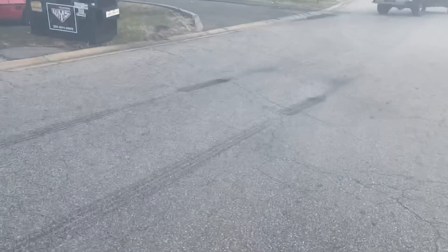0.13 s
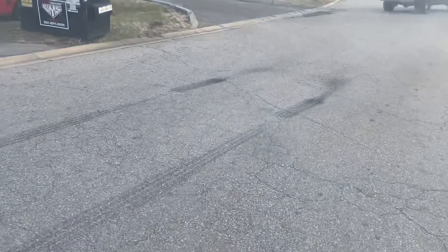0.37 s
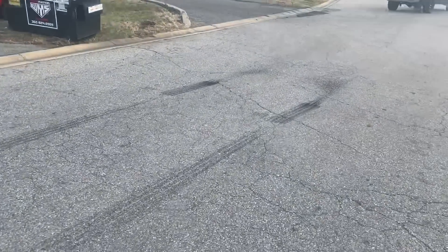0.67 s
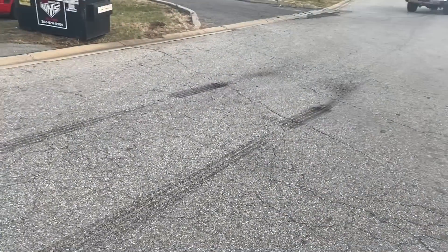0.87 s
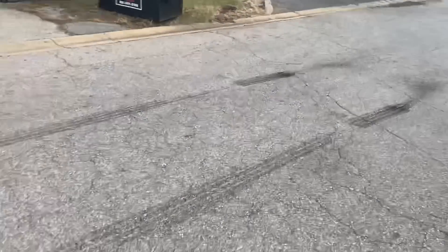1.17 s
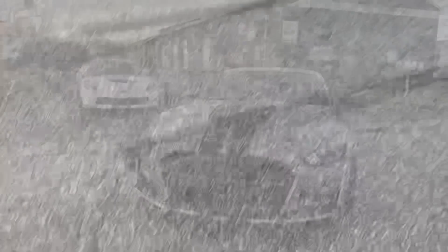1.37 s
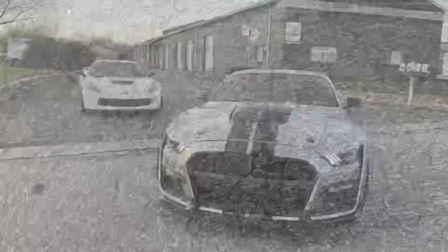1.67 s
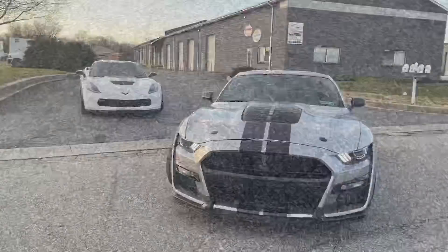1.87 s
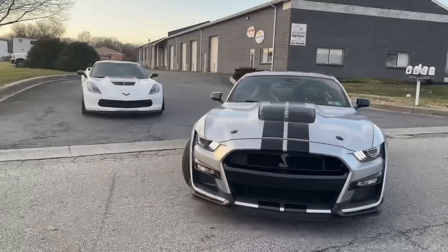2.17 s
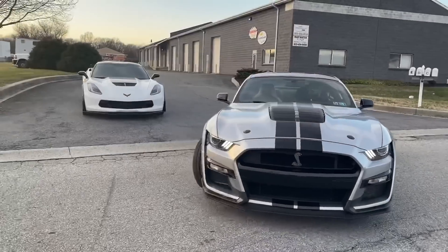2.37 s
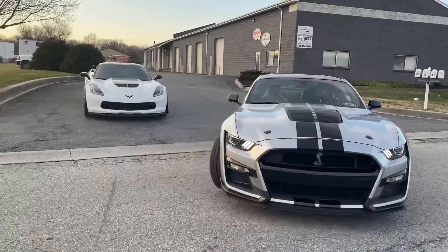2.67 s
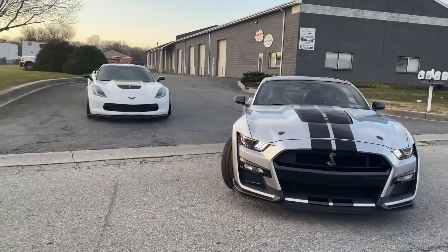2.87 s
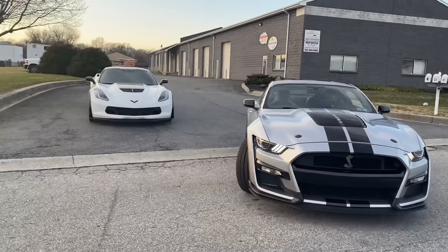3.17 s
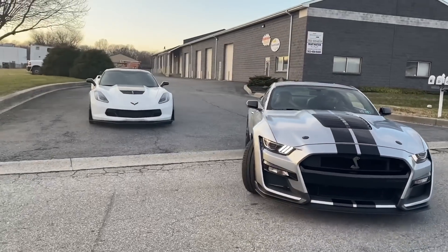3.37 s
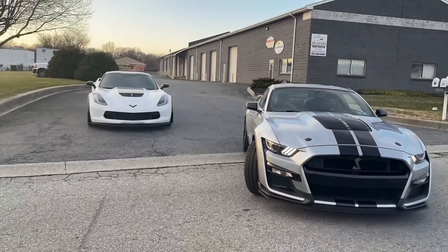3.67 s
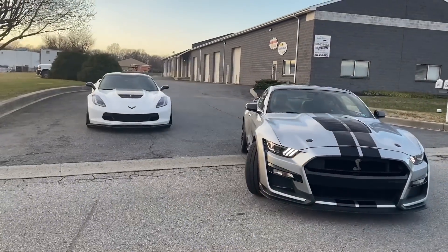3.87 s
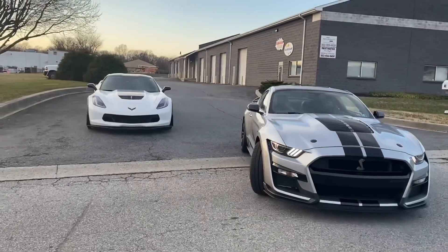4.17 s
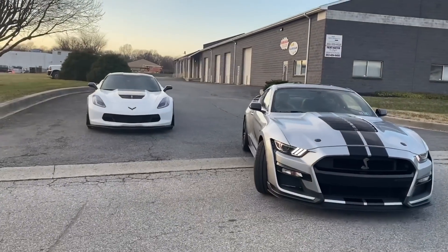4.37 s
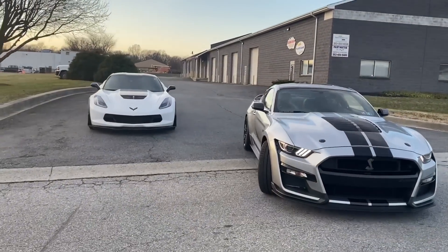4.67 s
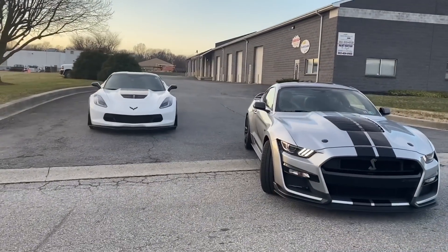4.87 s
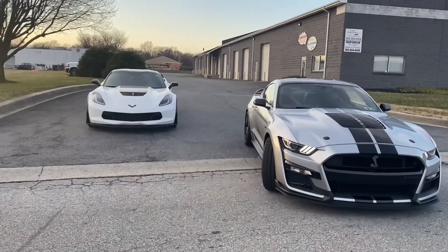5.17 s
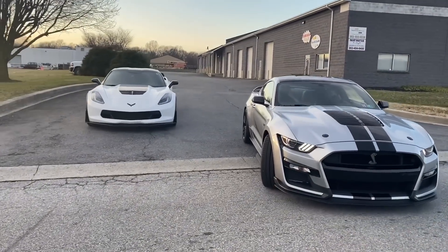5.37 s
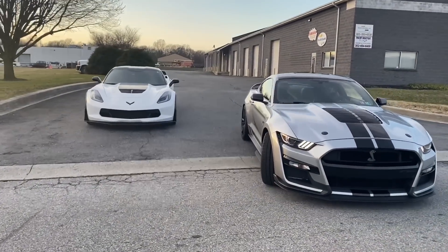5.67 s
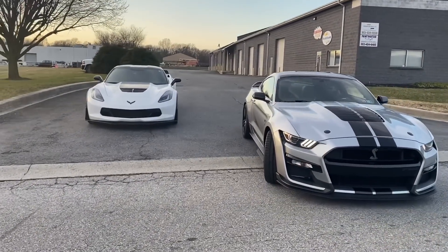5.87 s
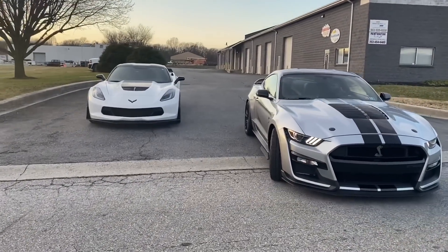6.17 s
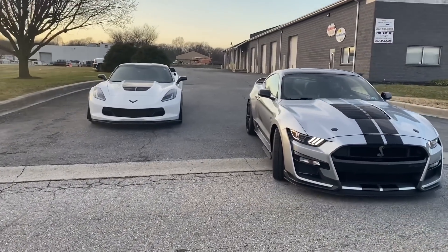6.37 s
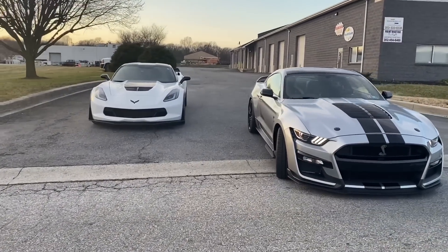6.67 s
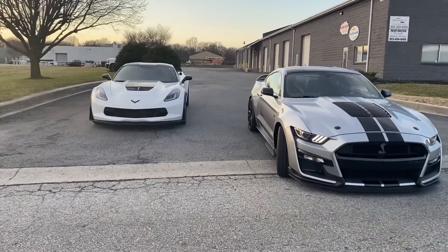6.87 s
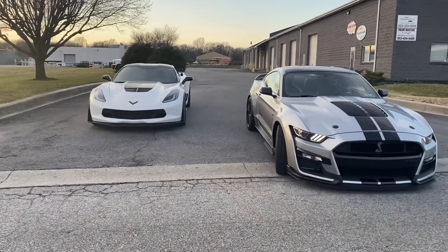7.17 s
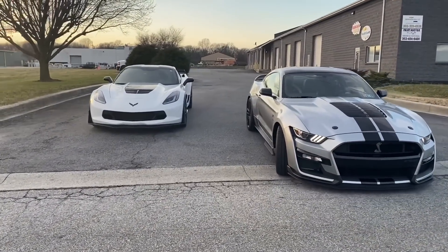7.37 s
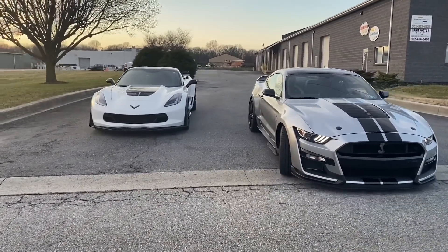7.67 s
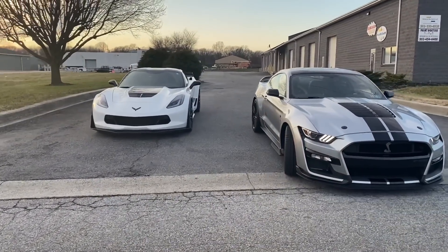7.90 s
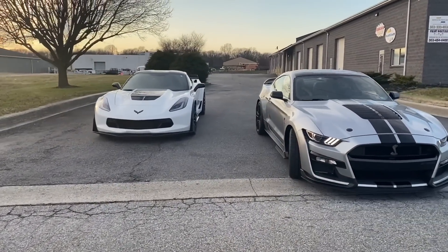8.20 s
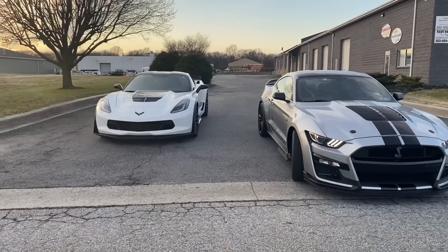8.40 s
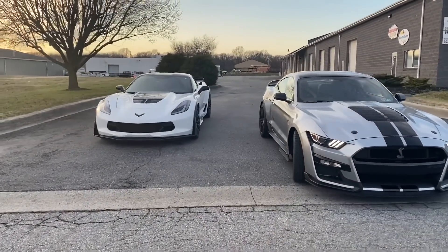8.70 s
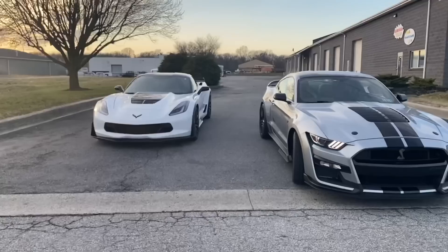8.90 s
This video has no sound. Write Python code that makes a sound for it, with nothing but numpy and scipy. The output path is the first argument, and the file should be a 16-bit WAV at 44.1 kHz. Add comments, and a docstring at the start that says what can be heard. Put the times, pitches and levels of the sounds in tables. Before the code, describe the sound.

A quiet, dull far-off engine rumble swells once, then over about a second crossfades to two cars idling close by outdoors. A heavy, uneven V8 throb sits over airy engine-bay rush and wavering belt whine. A few light taps bump the handheld microphone. From the middle onward the throttle is blipped, raspy and barking, falling back to lumpy idle, with two more pushes near the end. Short echoes return from a building.

```python
"""A distant idle rumbles and swells once; after a second it crossfades to two cars idling on a paved lot.
The near car rushes and whines: pulsing coloured noise and wavering belt sines. A few handling taps follow.
The V8 idles on: eight uneven firings a cycle ring its pipes, and a building throws the exhaust back.
Late on come three throttle blips and a light hold: the revs climb, and the gas rasps, hisses and barks more."""
import sys
import numpy as np
from scipy import signal
from scipy.fft import rfft, irfft, next_fast_len
from scipy.io import wavfile
from scipy.ndimage import uniform_filter1d, minimum_filter1d

SR = 44100
rng = np.random.default_rng(int(sys.argv[2]) if len(sys.argv) > 2 else 0)


def log_audio(samples):
    """Write samples as a 16-bit WAV file to the path given in sys.argv[1]."""
    # one column per channel
    frames = np.atleast_2d(samples).T
    # limit to full scale, then quantise
    limited = np.clip(frames, -1, 1)
    pcm = np.round(limited * 32767).astype(np.int16)
    wavfile.write(sys.argv[1], SR, pcm)


N = 398663
TIME = np.arange(N) / SR


def gain_of(db):
    """Decibels to a factor."""
    return 10 ** (np.asarray(db) / 20)


def evened(x):
    """Scales to rms 1."""
    return x / np.sqrt(np.mean(x ** 2) + 1e-20)


def steadied(x, size=9000):
    """Levels the slow loudness to rms 1 over windows of size samples, keeping the faster throb."""
    power = uniform_filter1d(uniform_filter1d(x ** 2, size), size)
    return x / np.sqrt(abs(power) + 1e-12)


def highpassed(x, order, hz):
    """Causal low cut."""
    return signal.sosfilt(signal.butter(order, hz, "high", fs=SR, output="sos"), x)


def split_off(x, order, hz, side):
    """The part of x above ("high") or below ("low") hz, without phase shift."""
    return signal.sosfiltfilt(signal.butter(order, hz, side, fs=SR, output="sos"), x)


def read(points, hz):
    """A spectrum table on a log-frequency axis."""
    f, value = np.transpose(points)
    return np.interp(np.log(hz + 1), np.log(f + 1), value)


def curves(rows):
    """Each column of a time table, for every sample."""
    s, *columns = np.transpose(rows)
    return [np.interp(TIME, s, c) for c in columns]


def coloured(x, points, size=16384):
    """Minimum-phase filter with the given spectrum: a pulse rings after it strikes."""
    log_gain = read(points, abs(np.fft.fftfreq(size, 1 / SR))) * np.log(10) / 20
    ring = np.fft.ifft(np.exp(np.conj(signal.hilbert(log_gain)))).real
    return signal.fftconvolve(x, ring[:size // 2])[:N]


def wander(rate_hz, size=32):
    """Slow random drift of rms 1, drawn once every size samples."""
    count = next_fast_len(N // size + 2)
    lowpass = np.exp(-(np.fft.rfftfreq(count, size / SR) / rate_hz) ** 2)
    slow = irfft(rfft(rng.standard_normal(count)) * lowpass, count)
    return np.interp(np.arange(N) / size, np.arange(count), evened(slow))


def resonate(x, hz, width):
    """A resonance of gain 1 that follows the curve hz."""
    turn, r = np.exp(2j * np.pi * np.cumsum(hz) / SR), np.exp(-np.pi * width / SR)
    return 2 * (turn * signal.lfilter([1 - r], [1, -r], x / turn)).real


def held(start, length, attack_s, release_s):
    """Rises from 0 to 1, holds until the length is over, then falls."""
    rise = np.clip((TIME - start) / attack_s, 0, 1)
    return rise * np.clip(1 - (TIME - start - length) / release_s, 0, 1)


# likeness of the two microphones: (frequency [Hz], correlation [-1 to 1])
MIC_LIKENESS = [(100, -0.062), (600, 0.9), (1400, 0.79), (3000, 0.52), (5000, -0.038), (7000, -0.052),
                (15000, 0.085)]


def noise_pair(points):
    """Coloured noise at two microphones: alike in the mids, unrelated in the deep bass and high treble."""
    hz = np.fft.rfftfreq(N, 1 / SR)
    a, b = rfft(rng.standard_normal((2, N)))
    same = np.clip(read(MIC_LIKENESS, hz), -1, 1)
    pair = np.array([a, same * a + np.sqrt(1 - same ** 2) * b])
    return evened(irfft(pair * gain_of(read(points, hz)), N))


def knock(s, db, hz, decay_s):
    """A short dull burst of noise around one pitch, dying away exponentially."""
    t = np.arange(SR // 8) / SR
    octave = signal.butter(2, [hz / np.sqrt(2), hz * np.sqrt(2)], "band", fs=SR, output="sos")
    burst = signal.sosfilt(octave, rng.standard_normal(len(t)))
    sound = gain_of(db) * evened(burst) * np.exp(-t / decay_s)
    return np.pad(sound, (round(s * SR), N))[:N]


# tone of the distant rumble: (frequency [Hz], relative level [dB])
DISTANT_COLOUR = [(20, -36), (40, -5), (80, -4.5), (150, -2), (190, -15), (320, -16), (375, -25),
                  (440, -13.5), (490, -20.5), (560, -27), (1000, -34.5), (1900, -42.5), (3400, -56),
                  (8000, -61), (11500, -90)]
# faint distant knocks: (time [s], level at the strike [dB], pitch [Hz])
DISTANT_KNOCKS = [(.135, -70, 1090), (.525, -54, 170)]
DISTANT_DB, FAR_BASS_DB = -52.5, -5.5  # rumble before the bass trim, and that trim
FAR_SWELL_AT_S, FAR_SWELL_S, FAR_SWELL_DB = 0.58, 0.065, 7  # one swell of the bass


def distant_idle():
    """A far engine: a wavering firing tone in a dull rumble that swells once, and faint knocks."""
    turns = np.cumsum(82 + 2 * wander(11.0)) / SR
    flutter_db = 1.5 * wander(14)
    rumble = gain_of(DISTANT_DB + flutter_db) * noise_pair(DISTANT_COLOUR)
    bass = split_off(rumble, 2, 300, "low")
    swell = np.exp(-((TIME - FAR_SWELL_AT_S) / FAR_SWELL_S) ** 2)
    rumble = rumble + (gain_of(FAR_BASS_DB + FAR_SWELL_DB * swell) - 1) * bass
    tone = gain_of(-56.5 + 2 * wander(21)) * np.sin(2 * np.pi * turns)
    return rumble + tone + sum(knock(*row, decay_s=.025) for row in DISTANT_KNOCKS)


# light handling taps on the microphone: (time [s], left level at the strike [dB])
HANDLING_TAPS = [(2.994, -34), (3.178, -28), (3.29, -28), (5.198, -26), (7.179, -28)]


def handling_taps():
    """Very short knocks, mostly in the left microphone."""
    taps = sum(knock(s, db, hz=1050, decay_s=0.0037) for s, db in HANDLING_TAPS)
    return taps * np.array([[1], [.15]])


# tone of the near car's rush: (frequency [Hz], relative level [dB])
BAY_TONE = [(100, 14), (400, -7), (650, 6.5), (880, 6), (1050, 0.5), (1220, 1.5), (1600, 0), (2200, -5),
            (2800, -7.5), (3400, -7.5), (4300, -11.5), (5600, -13), (7000, -14), (14000, -46)]
# belt and pulley tones: (multiple of the base tone, level before the belt curve [dB])
BELT_TONES = [(7, -47), (11, -79), (16, -44.5), (18, -50), (22, -51), (24, -48), (25, -53.5), (29, -66),
              (31, -52.5), (32, -57.5), (34, -55), (40, -55.5), (49, -60)]
# the bay along the walk: (time [s], rush level unloaded [dB], treble trim [dB], belt trim [dB])
BAY_WALK = [(1.25, -32.5, 2, -3), (1.7, -32, 0.5, 1), (2.3, -31, -1, 6), (3.0, -33, -0.5, 2.5),
            (3.6, -35, -3, 1), (5.5, -35, -2.5, 0), (7.3, -35, -5.5, -6), (9, -36.5, -2, 2)]
WHINE_HZ = 37.83  # mean base tone of the belt
BAY_LOAD_DB = 2  # the bay rushes louder under full load


def engine_bay(load):
    """Fan and valve-train noise of the near car, pulsing with its crank, and its wavering belt tones."""
    level_db, treble_db, belt_db = curves(BAY_WALK)
    turns = np.cumsum(WHINE_HZ * (1 + 0.001944 * wander(3.43))) / SR
    crank = 2 * np.pi * turns / 3
    pulse_db = 0.27 * np.cos(4 * np.pi * turns) + 0.12 * np.cos(crank)
    patter = evened(gain_of(0.25 * wander(170) + pulse_db + 0.85 * wander(34)))
    rush = noise_pair(BAY_TONE) * patter
    rush = rush + (gain_of(treble_db) - 1) * split_off(rush, 2, 4200, "high")
    tones = 0
    for k, db in BELT_TONES:
        sine = np.sin(2 * np.pi * (k * turns + rng.random()))
        tones = tones + gain_of(db + 3.5 * wander(22)) * sine
    rush = rush * gain_of([[-.9], [.9]])  # slightly to the right
    return gain_of(level_db + BAY_LOAD_DB * load) * rush + gain_of(belt_db) * tones


def lot(x, t60=0.14, count=300):
    """Scattered echoes off the wall and the cars, partly different at each microphone and thin in the bass."""
    at = rng.integers(SR // 300, SR // 3, (2, count))
    echoes = np.zeros((2, SR // 3))
    np.put_along_axis(echoes, at, rng.choice([-1., 1.], at.shape) * gain_of(-60 * at / SR / t60), 1)
    apart = .65
    echoes = echoes[0] + apart * np.array([echoes[1], -echoes[1]])
    echoes = highpassed(echoes / np.linalg.norm(echoes[0]), 2, 400)
    return signal.fftconvolve(x[None], echoes, axes=1)[:, :N]


# ground reflections along the walk:
# (time [s], low dip centre [Hz], high dip centre [Hz], lift centre [Hz], lift [dB])
REFLECTIONS = [(1.3, 980, 2300, 1250, 3.5), (2.4, 980, 2040, 1300, -0.5), (2.8, 1020, 2090, 3270, 3),
               (4, 1130, 2370, 3700, 3.5), (5, 1230, 1840, 3380, 0), (6, 1280, 1840, 3280, -0.5),
               (6.7, 1730, 3000, 3330, 4.5), (7.7, 1750, 2970, 3660, 4), (8.3, 1260, 2780, 3250, 1),
               (9, 1250, 2750, 3360, 2.5)]
# uneven colour from the bodywork, drifting slowly: (frequency [Hz], depth [dB])
BODYWORK = [(400, 0), (1000, 1.3), (8000, 1.5)]
BAND_WIDTHS_HZ, LOW_DIP_DB, HIGH_DIP_DB = (120, 180, 220), -4.5, -2  # half widths, then dip depths


def walked_past(pair):
    """Reflections colour the sound: two dips and a varying lift slide with the listener's steps, among patches."""
    hz, s, z = signal.stft(pair, SR, nperseg=1024)
    when, *centres, lift_db = np.transpose(REFLECTIONS)
    depths = LOW_DIP_DB, HIGH_DIP_DB, np.interp(s, when, lift_db)
    bands = 0
    for centre, width, db in zip(centres, BAND_WIDTHS_HZ, depths):
        offset = (hz[:, None] - np.interp(s, when, centre)) / width
        bands = bands + db * np.exp(-offset ** 2)
    patches = uniform_filter1d(rng.standard_normal(z.shape[1:]), size=4, axis=0)
    patches = evened(uniform_filter1d(uniform_filter1d(patches, size=40, axis=1), size=12, axis=1))
    colour_db = bands + read(BODYWORK, hz)[:, None] * patches
    return signal.istft(z * gain_of(colour_db), SR, nperseg=1024)[1][:, :N]


# idle of the V8, settling and then hunting: (time [s], crank speed [turns a minute])
IDLE_SPEED = [(0, 890), (1.552, 853.8), (2.044, 693.5), (2.655, 740.2), (3.204, 665.4), (3.842, 737.1),
              (4.458, 709.6), (5.619, 792.6), (5.732, 718.9), (7.275, 758.5), (7.71, 722)]
# three blips and a light hold: (start [s], held [s], eased off over [s], pull [turns a minute],
# load [0-1], time to fill the manifold [s], strong burns last [s])
PEDAL = [(4.599, .511, .03, 343.6, .95, .4, .69), (5.709, .131, .424, 548, .92, .16, .56),
         (7.853, .433, .197, 442, 1, .33, .69), (8.553, .48, .1, 217.6, .33, .45, .7)]
PEDAL_DOWN_S, FLYWHEEL_S = .08, .354
EMPTY_S = .11  # the manifold empties and the burns fall away


def crank_speed():
    """Turns a minute: the pedal pulls the flywheel above its idle, and it coasts back."""
    pull = sum(rpm * held(start, length, PEDAL_DOWN_S, ease_s)
               for start, length, ease_s, rpm, *_ in PEDAL)
    keep = np.exp(-1 / (FLYWHEEL_S * SR))
    return curves(IDLE_SPEED)[0] + signal.lfilter([1 - keep], [1, -keep], pull)


def engine_load():
    """How hard the cylinders burn, 0-1: one swell for each press, growing as the manifold fills."""
    return sum(load * held(start, burn_s, fill_s, EMPTY_S)
               for start, *_, load, fill_s, burn_s in PEDAL)


def blowdown(clicks, decay_s, between):
    """Gas flow: a quick surge at each firing that dies away over a steady stream."""
    surges = signal.lfilter([1], [1, -np.exp(-1 / (decay_s * SR))], clicks)
    return between + evened(surges)


def manifold_ripple(cycles, count=512):
    """Each cylinder's path through the manifold: a ripple repeating each cycle and slowly changing shape."""
    first, second = [np.interp(cycles % 1, np.arange(count) / count, shape)
                     for shape in rng.standard_normal((2, count))]
    drift = 1.59 * wander(0.95)
    return np.cos(drift) * first + np.sin(drift) * second


# pipe resonances that speak up as the revs rise:
# (frequency [Hz], width [Hz], level unloaded [dB], extra at full load [dB])
BARK_MODES = [(260, 135, -1, -3), (406.6, 31, 6.5, 1), (461, 71, 8, -0.5), (497, 39, 3, 7),
              (606, 51, -1.5, 6), (686, 29, -0.5, 4), (950, 190, -12.5, 5.5)]


def bark(x, load):
    """Pipe resonances waver with the hot gas and swell unevenly; hard burns drive the upper ones most."""
    waver, swell_db = .02, 2.1
    total = 0
    for k, (hz, width, db, load_db) in enumerate(BARK_MODES):
        gain = (-1) ** k * gain_of(db + load_db * load + swell_db * wander(15))
        total = total + gain * resonate(x, hz * (1 + waver * wander(6.1)), width)
    return total


# one row a cylinder, in firing order:
# (crank angle [degrees], boom at idle [dB], rasp [dB], boom at full load [dB])
FIRING_ORDER = [(31.6, 3, -4, 1), (118.55, 2.5, -10.5, 1.2), (212.8, 4.5, -7, 3), (299.3, 6.5, -1, 5.5),
                (390.5, 6.5, 3, 4.5), (477.8, 4.5, 0, 2.5), (572.7, 4, -4, 4), (661.5, 7, -3, 7)]


def firings(cycles, shut_db, open_db, load, lope, scatter_db, jitter_degrees):
    """One click a firing: load shifts the cylinders' strengths, lope widens their differences, chance varies them."""
    count = int(cycles[-1]) + 1
    strength, lateness = rng.standard_normal((2, count, len(FIRING_ORDER)))
    degrees = np.transpose(FIRING_ORDER)[0] + jitter_degrees * lateness
    due = np.arange(count)[:, None] + degrees / 720
    at = np.searchsorted(cycles, due)
    opened, spread = np.append(load, 0)[at], np.append(lope * np.ones(N), 0)[at]
    shut_part = (1 - opened) * (shut_db - shut_db.mean())
    open_part = opened * (open_db - open_db.mean())
    db = spread * (shut_part + open_part) + scatter_db * strength
    return np.bincount(at.ravel(), gain_of(db).ravel(), N + 1)[:N]


# tone of the boom, the rasp and the gas hiss: (frequency [Hz], relative level [dB])
PIPE_TONE = [(22, -27), (35, -42), (47, -7.5), (53, -2.5), (63, 3), (70, 7), (80, 9), (97, 9.5), (116, 2),
             (141, 4), (158, -4), (200, -16), (260, -27.5), (350, -27.5), (700, -71)]
RASP_TONE = [(185, 2.5), (235, -2), (305, -3), (370, -4), (425, 1.5), (480, -1.5), (540, -5), (610, -4.5),
             (710, -6), (800, -21.5), (1300, -25), (4000, -53), (9000, -73)]
GAS_TONE = [(300, -25), (900, 7), (2000, 15.5), (5000, 11.5), (7000, -6), (10000, 11), (12000, 2),
            (14000, 7), (16000, 3)]
# low-idle levels as the listener walks past the nose of the V8:
# (time [s], boom [dB], rasp [dB], gas hiss [dB])
EXHAUST_WALK = [(1.2, -10.5, -29, -46), (1.6, -14.5, -34.5, -48.5), (2.15, -10.5, -38, -49),
                (2.6, -11.5, -32.5, -48.5), (3.2, -12.5, -34.5, -48.5), (3.9, -12, -29.5, -47.5),
                (6.0, -14, -31.5, -50.5), (7.3, -13, -30, -50.5), (7.85, -13.5, -31, -50),
                (8.3, -15, -31, -50), (9, -15.5, -32, -49.5)]
# uneven burning, most while coasting down after a blip:
# (time [s], factor on the cylinders' dB differences before its random drift)
LOPE_CURVE = [(1.4, 1.2), (2.1, .8), (3.6, .95), (4.0, 1.45), (4.6, 1.15), (5.1, 1.05), (5.45, 1.65),
              (5.8, 1.65), (6.05, .95), (6.45, 1.6), (7.8, 1.1), (8.05, 1.5), (8.3, .95), (8.7, 1.4)]
LOW_RPM, RPM_RANGE = 726, 321  # revs run from 0 to 1 over this range
# what each gains: (at full revs [dB], at full load [dB])
BOOM_RISE_DB, RASP_RISE_DB, HISS_RISE_DB = (1.1, 4), (5.5, 5), (1, 3.5)
RASP_FROM_HZ = 165  # below this the exhaust is clean firing pulses
STEADY_FLOW, STEADY_FLOW_LOAD = .75, .55  # gas between surges: throttle shut, and less at full load
EVEN_UNDER_LOAD = 0.6  # with the throttle open the weak cylinders crack too


def exhaust(rpm, load):
    """Firing pulses ring the pipes; each surge of gas rasps and hisses at the tips, and barks as the revs rise."""
    cycles = np.cumsum(rpm) / (120 * SR)  # two turns a cycle
    revs = np.clip((rpm - LOW_RPM) / RPM_RANGE, 0, 1)
    rises = np.array([BOOM_RISE_DB, RASP_RISE_DB, HISS_RISE_DB]) @ np.array([revs, load])
    boom_db, rasp_db, hiss_db = curves(EXHAUST_WALK) + rises
    _, idle_boom_db, crack_db, loaded_boom_db = np.transpose(FIRING_ORDER)

    lope = curves(LOPE_CURVE)[0] * (1.08 + .18 * wander(6))
    thumps = firings(cycles, idle_boom_db, loaded_boom_db, load, lope, scatter_db=.8, jitter_degrees=1.4)
    boom = -coloured(thumps, PIPE_TONE)
    boom = boom + .28 * wander(7) * split_off(boom, 4, 125, "high")  # the upper boom comes and goes

    open_crack_db = (1 - EVEN_UNDER_LOAD) * crack_db
    cracks = firings(cycles, crack_db, open_crack_db, load, 1, scatter_db=1.5, jitter_degrees=1.1)
    flow = blowdown(cracks, decay_s=0.006, between=STEADY_FLOW - STEADY_FLOW_LOAD * load)
    repeating = evened(coloured(flow * manifold_ripple(cycles), RASP_TONE))
    turbulent = evened(coloured(flow * rng.standard_normal(N), RASP_TONE))
    crack_share, turbulent_share = .15 + .75 * load, .5 - .25 * load
    rasp = repeating + turbulent_share * turbulent + crack_share * evened(coloured(cracks, RASP_TONE))
    rasp = highpassed(rasp, 4, RASP_FROM_HZ)
    rasp = steadied((1 - 0.45 * revs) * rasp + 0.79 * revs * bark(rasp, load), size=3000)

    hiss = noise_pair(GAS_TONE) * evened(blowdown(cracks, decay_s=0.0051, between=10))
    boom = gain_of(boom_db + 0.15 * wander(1.7)) * steadied(boom)
    rasp = gain_of(rasp_db + 1.4 * wander(19)) * rasp
    return boom + rasp, gain_of(hiss_db + 0.5 * wander(10)) * hiss


FADE_AT_S, FADE_S = 1.146, 0.97  # the cars fade in as the distant idle fades out


def scene():
    """The distant idle gives way to the two cars."""
    load = engine_load()
    pipes, hiss = exhaust(crank_speed(), load)
    echoes = gain_of(-5.0) * lot(pipes)
    cars = walked_past(pipes + echoes + hiss + engine_bay(load))
    fade = np.clip((TIME - FADE_AT_S) / FADE_S, 0, 1)
    return fade * cars + (1 - fade) * distant_idle() + handling_taps()


EDGE_HZ = 15300  # upper band limit


def record(dry):
    """A limiter holds the biggest thumps under full scale; then the band limit."""
    ceiling = .89
    allowed = ceiling / np.maximum(abs(dry).max(0), ceiling)
    limited = dry * uniform_filter1d(minimum_filter1d(allowed, size=900), size=900)
    lowpass = signal.firwin(511, EDGE_HZ, window=("kaiser", 9), fs=SR)
    return signal.oaconvolve(limited, lowpass[None], "same")


dry = scene()
out = record(dry)
log_audio(out)
```